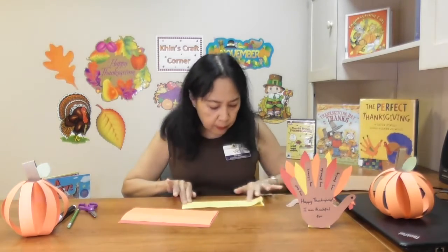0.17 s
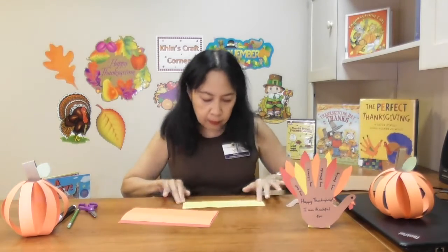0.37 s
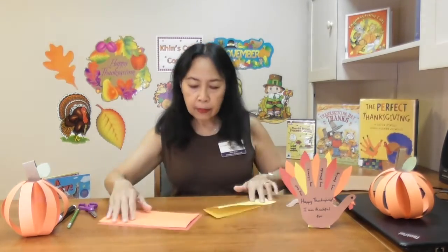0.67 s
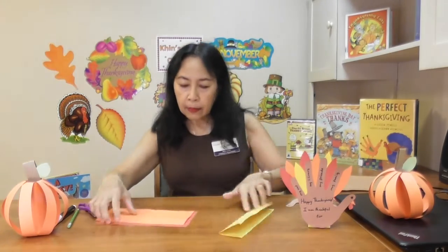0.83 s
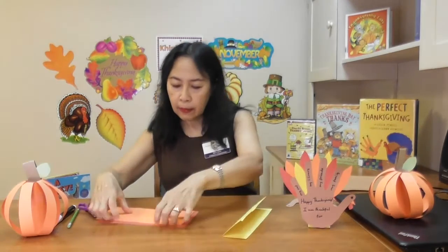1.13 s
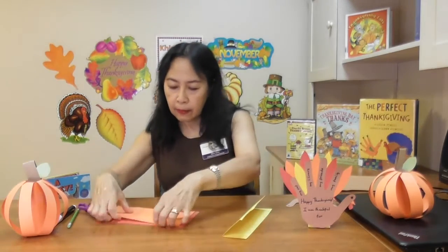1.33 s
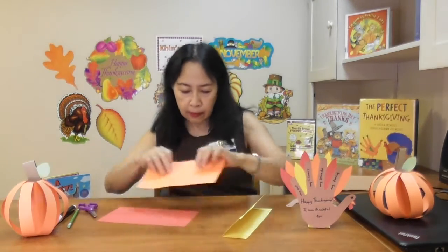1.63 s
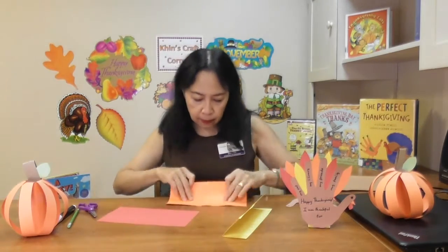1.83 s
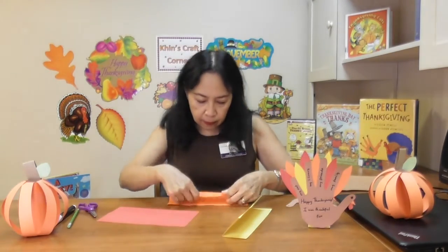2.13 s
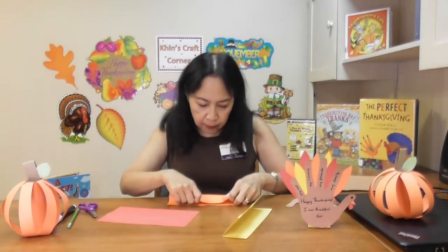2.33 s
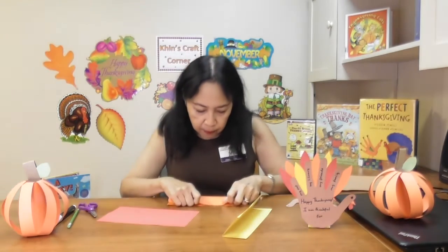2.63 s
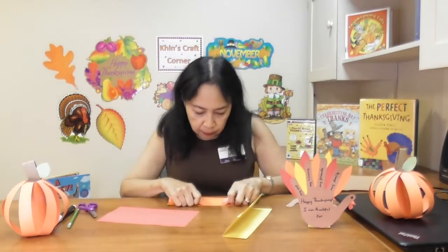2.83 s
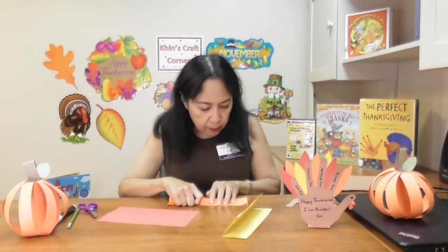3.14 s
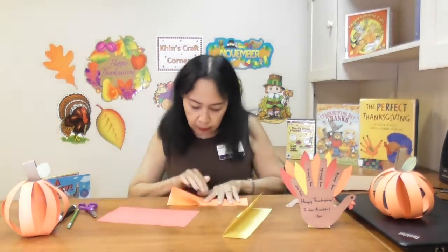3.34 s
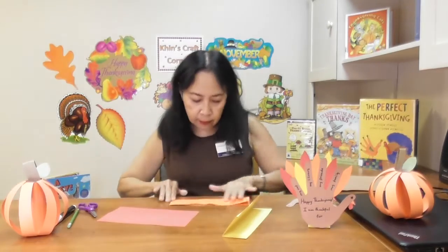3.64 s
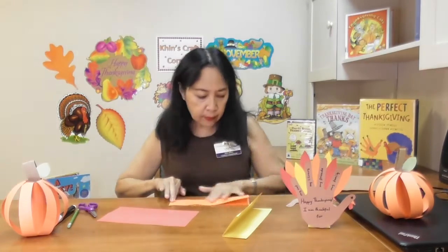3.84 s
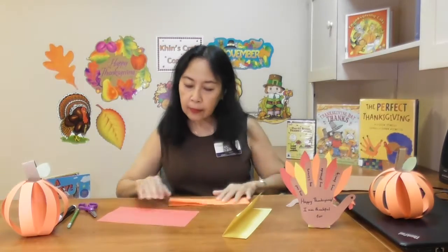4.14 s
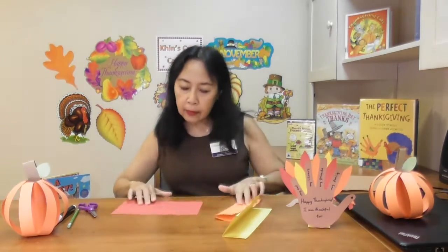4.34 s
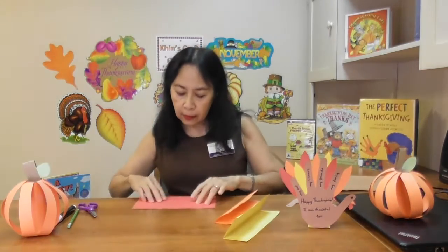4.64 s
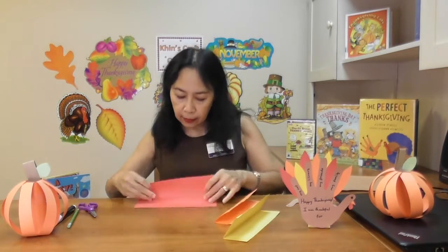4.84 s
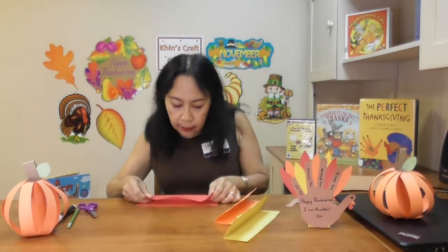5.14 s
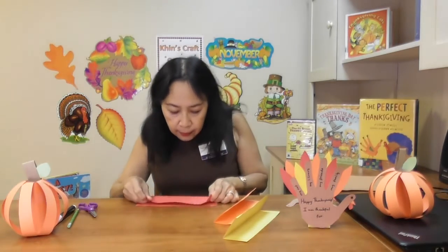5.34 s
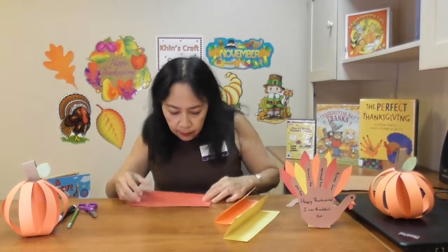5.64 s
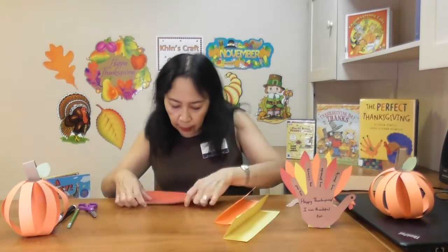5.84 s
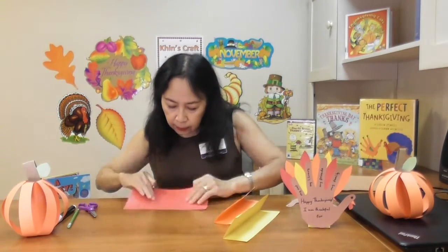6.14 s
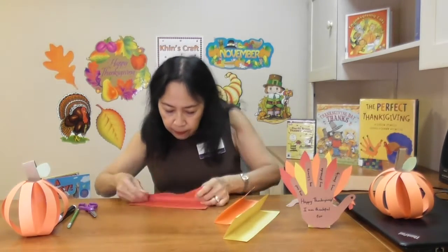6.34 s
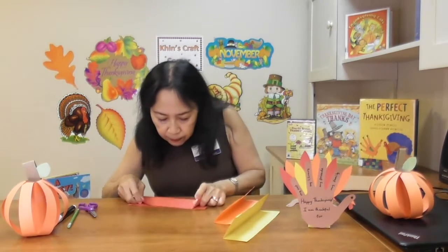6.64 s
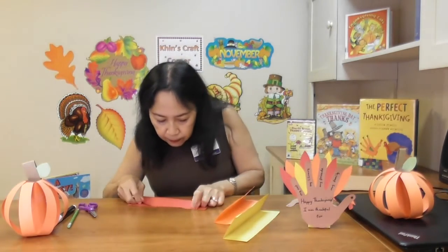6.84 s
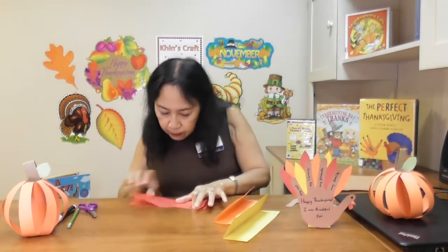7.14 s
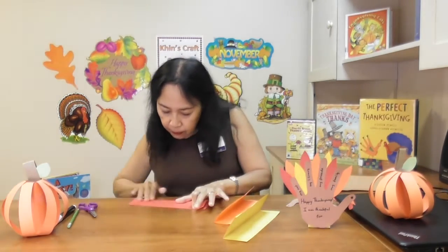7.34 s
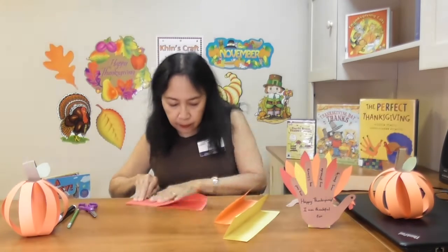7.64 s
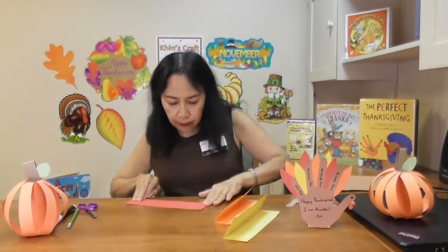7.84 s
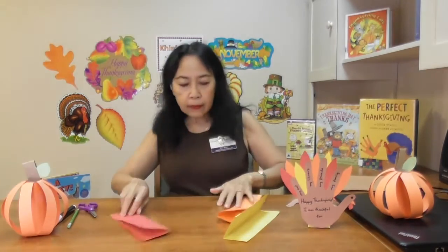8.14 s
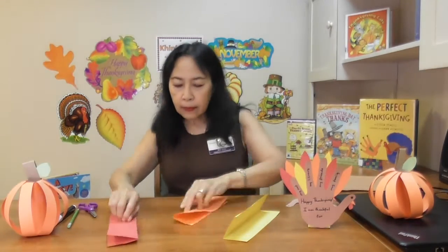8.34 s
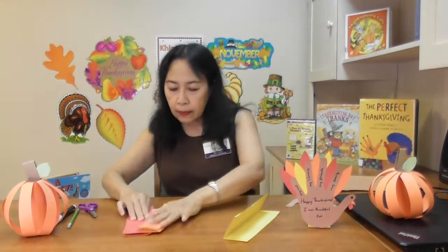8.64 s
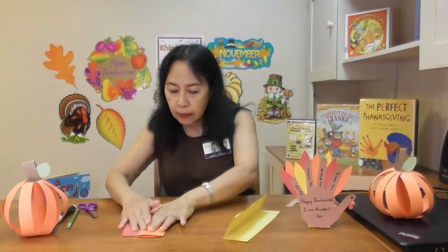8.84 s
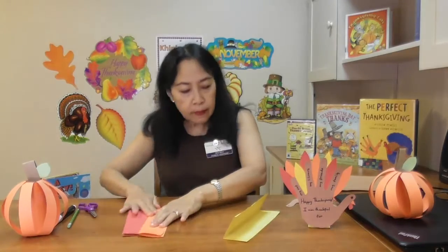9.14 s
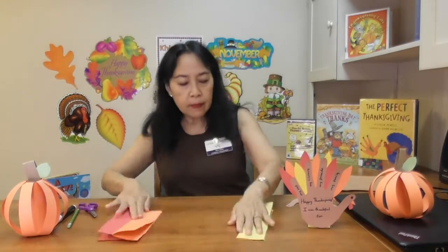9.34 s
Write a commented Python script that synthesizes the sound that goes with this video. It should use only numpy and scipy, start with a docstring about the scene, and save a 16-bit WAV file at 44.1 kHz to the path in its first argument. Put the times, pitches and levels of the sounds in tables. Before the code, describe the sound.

In a small, quiet room, hands fold paper on a wooden table. A soft rubbing hiss with hand drag opens, over a low rush that fades by about 3 s. From 0.9 to 1.4 s there are only light touches and ticks. At 1.6 s a sharp scrape and cluster of snaps start a rustling turn, lasting to 2.2 s; a near pause follows. From 2.9 to 4.3 s firm creasing strokes hiss brightly, with strong snaps near 3.15 s. After a short gap, bending crackles and small pops begin at 4.7 s. The busiest, loudest handling comes at 5.5-6.4 s, with knocks near 5.8 s and a coarse scrape at 6.15 s. After a lull, crisp rubs run from 6.9 to 7.9 s, then looser rustles and slides continue to about 9.5 s. Lower sounds lean left; treble stays central.

```python
"""A small room with a wooden table: hands fold, crease and slide sheets of craft paper on it. Each movement is
one arch of speed that drives filtered noise: sliding hisses and scrapes, bending rustles. Edges snap (noise
bursts), panels pop (rising modes), fingers and sheets knock (ringing table modes). Behind lie soft air puffs, a
low drone, a faint steady noise floor and a fading rush; below about 2 kHz the sound leans left."""
import sys
import numpy as np
from scipy import signal
from scipy.fft import rfft, irfft, next_fast_len
from scipy.io import wavfile
from scipy.ndimage import uniform_filter1d

SR = 44100
rng = np.random.default_rng(int(sys.argv[2]) if len(sys.argv) > 2 else 0)


def output_pcm(signal):
    """Save a mono or channel-first signal as 16-bit PCM at the path in sys.argv[1].

    Samples are clipped to [-1, 1] before scaling.
    """
    pcm = np.clip(np.atleast_2d(signal).T, -1, 1) * 32767
    wavfile.write(sys.argv[1], SR, np.round(pcm).astype(np.int16))


N = 418509
TIME_S = np.arange(N) / SR


def amp(db):
    """Converts dB to amplitude."""
    return 10 ** (np.asarray(db) / 20)


def unit(x):
    """Scales to rms 1."""
    return x / np.sqrt(np.mean(x ** 2) + 1e-20)


def read(points, hz):
    """Interpolates a curve on a log-frequency axis."""
    point_hz, value = np.transpose(points)
    return np.interp(np.log(hz + 1), np.log(np.abs(point_hz) + 1), value)


def follow(rows, t_s):
    """Interpolates every column of a time curve."""
    point_s, *columns = np.transpose(rows)
    return [np.interp(t_s, point_s, column) for column in columns]


def add(mix, start_s, sound):
    """Adds a sound in place, cut off at the end of the mix."""
    part = mix[max(round(start_s * SR), 0):][:len(sound)]
    part += sound[:len(part)]


def colour(x, gain):
    """Filters by a gain given as a function of frequency."""
    size = next_fast_len(len(x) + 4096)
    hz = np.fft.rfftfreq(size, 1 / SR)
    return irfft(rfft(x, size) * gain(hz), size)[:len(x)]


def edge(x, hz, kind, order):
    """Causal Butterworth low-pass or high-pass."""
    sos = signal.butter(order, np.clip(hz, 20, .45 * SR), kind, fs=SR, output="sos")
    return signal.sosfilt(sos, x)


def noise_spectrum(spectrum):
    """Steady noise of rms 1 with the given spectrum."""
    return unit(colour(rng.standard_normal(N), lambda hz: amp(read(spectrum, hz))))


def wander(hz):
    """Random drift of rms 1 with a Gaussian roll-off at the given rate."""
    return unit(colour(rng.standard_normal(N), lambda f: np.exp(-(f / hz) ** 2)))


def slips(per_s, spread_db, smooth):
    """Fibres catch and let go: sparse clicks of uneven size over a blur of tiny ones."""
    sizes = amp(spread_db * np.minimum(rng.exponential(1, N), 4))
    signs = rng.choice([-1., 1.], N)
    clicks = sizes * signs * (rng.random(N) < per_s / SR)
    return unit(unit(clicks) + smooth * rng.standard_normal(N))


def patchy(drive, spectrum, patchy_db, tilt_db_per_octave=None):
    """Shapes noise to a spectrum whose colour drifts in random patches, with an optional tilt."""
    hz, t_s, z = signal.stft(drive, SR, nperseg=512, noverlap=384)
    patches = uniform_filter1d(rng.standard_normal(z.shape), size=3, axis=0)
    patches = unit(uniform_filter1d(patches, size=14, axis=1))
    shape_db = read(spectrum, hz)[:, None] + patchy_db * patches
    if tilt_db_per_octave is not None:
        octaves = np.log2(np.clip(hz, 900, 3000) / 1600)
        shape_db = shape_db + octaves[:, None] * np.interp(t_s, TIME_S, tilt_db_per_octave)
    gain = amp(shape_db)
    gain = gain / np.linalg.norm(gain, axis=0)
    return unit(signal.istft(z * gain, SR, nperseg=512, noverlap=384)[1][:N])


def speed(length_s, fastest, landing=0.19, touch_s=0.0036):
    """A hand lands part-way up its arch of speed and slows to a stop; a slow rise fades in gently."""
    t_s = np.arange(0, max(length_s, touch_s), 1 / SR)
    rise_s = length_s * np.clip(fastest, 0, 1)
    phase = np.interp(t_s, [0, rise_s, length_s], [landing, .5, 1])
    contact = np.minimum(t_s / max(touch_s, 0.17 * rise_s), 1)
    return np.abs(np.sin(np.pi * phase)) * contact


def loudness(moves, power, rest_db):
    """Level [dB] of moves (start, length, fastest, dB), each a power of speed, summed over a floor."""
    energy = np.full(N, amp(rest_db) ** 2)
    for start_s, length_s, fastest, db in moves:
        add(energy, start_s, (amp(db) * speed(length_s, fastest) ** power) ** 2)
    return 10 * np.log10(energy)


# Hand or sheet slides: (start [s], length [s], position of top speed [0-1 of length],
# relative fine hiss level [dB], relative coarse scrape level [dB])
SLIDE_STROKES = [(0, 0.39, 0.3, -45.5, -47.5), (0.406, 0.14, 0.72, -54.5, -57),
                 (0.517, 0.1, 0.17, -45, -55), (0.572, 0.23, 0.31, -47, -55.5),
                 (0.691, 0.29, 0.54, -48, -57.5), (0.98, 0.034, 0.6, -57, -85),
                 (1.092, 0.07, 0, -54.5, -106), (1.201, 0.058, 0.37, -57.5, -78),
                 (1.262, 0.065, 0.46, -62.5, -72), (1.422, 0.35, 0.27, -49, -53),
                 (1.584, 0.084, 0.17, -34.5, -38), (1.773, 0.47, 0.24, -45, -42.5),
                 (2.041, 0.16, 0.46, -45, -45), (2.303, 0.078, 0.37, -52, -58),
                 (2.355, 0.076, 0.5, -56.5, -68), (2.492, 0.066, 0.58, -62, -52),
                 (2.529, 0.33, 0.31, -71, -65.5), (2.779, 0.039, 0.16, -55, -61.5),
                 (2.874, 0.16, 0.84, -49.5, -45.5), (2.996, 0.29, 0.46, -43.5, -47),
                 (3.219, 0.23, 0.7, -42.5, -47.5), (3.445, 0.27, 0.19, -36, -47.5),
                 (3.682, 0.15, 0.51, -40, -55.5), (3.81, 0.17, 0.59, -39, -54),
                 (3.885, 0.12, 0.65, -44, -53.5), (4.155, 0.045, 0.73, -45.5, -50.5),
                 (4.188, 0.22, 0.21, -51, -59), (4.312, 0.17, 0.62, -49, -62),
                 (4.726, 0.39, 0.42, -44.5, -62.5), (4.789, 0.34, 0.28, -58, -42.5),
                 (4.997, 0.23, 0.43, -48, -45.5), (5.186, 0.16, 0.12, -63.5, -60),
                 (5.494, 0.18, 0.57, -43.5, -43), (5.646, 0.079, 0.37, -51.5, -48.5),
                 (5.765, 0.066, 0, -52, -40.5), (5.812, 0.12, 0, -47.5, -46.5),
                 (5.871, 0.22, 0.73, -39.5, -41), (6.151, 0.097, 0.45, -46, -34),
                 (6.198, 0.42, 0.41, -39, -45), (6.561, 0.1, 0.4, -62, -56), (6.932, 0.066, 0.65, -49, -56),
                 (6.978, 0.16, 0.44, -40.5, -50.5), (7.122, 0.14, 0.34, -39, -45.5),
                 (7.282, 0.25, 0.08, -39.5, -45.5), (7.547, 0.14, 0.53, -38, -49.5),
                 (7.673, 0.21, 0.47, -33.5, -47), (7.983, 0.88, 0.1, -50.5, -57.5),
                 (8.252, 0.16, 0.28, -41, -50.5), (8.416, 0.11, 0.34, -35, -43),
                 (8.466, 0.24, 0.82, -50.5, -53.5), (8.622, 0.18, 0.58, -46, -52.5),
                 (8.86, 0.21, 0.6, -43.5, -54), (9.041, 0.22, 0.48, -39, -47),
                 (9.311, 0.2, 0.15, -50.5, -60), (9.435, 0.092, 0.9, -39.5, -48)]


def scraping():
    """Relative scrape level [dB] of all strokes; the floor is fingers never quite still."""
    moves = [(start_s, length_s, fastest, db) for start_s, length_s, fastest, _, db in SLIDE_STROKES]
    return loudness(moves, power=3.72, rest_db=-88.5)


# Spectra of sliding paper: (frequency [Hz], relative level [dB])
HISS_SPECTRUM = [(2000, -59.5), (4500, -32.5), (7000, -7.5), (10000, -8.5), (12000, 0), (14000, 3),
                 (15500, 2)]
SCRAPE_SPECTRUM = [(1200, -34), (2200, -5.5), (3200, -6), (4300, 6.5), (5400, 5), (7000, 2), (9000, -4.5),
                   (14000, -25)]


def sliding():
    """Dense tiny slips hiss, with a coarser scrape; a light touch breaks up into separate ticks."""
    moves = [(start_s, length_s, fastest, db) for start_s, length_s, fastest, db, _ in SLIDE_STROKES]
    hiss_db = loudness(moves, power=2.79, rest_db=-82)
    scrape_db = scraping()
    lightness = np.clip((-51.5 - np.maximum(hiss_db, scrape_db)) / 14, 0, 1)
    catches = (rng.random(N) < 22 / SR) * rng.uniform(0.92, 1, N)  # 22 per s
    ticks = signal.lfilter([1], [1, -np.exp(-1 / (0.014 * SR))], catches)  # 14 ms decay
    flutter = amp(1.53 * wander(hz=58.7))
    grip = 1 - 0.72 * lightness + 2.03 * lightness * ticks
    drive = slips(per_s=2400, spread_db=2.5, smooth=1.0) * flutter * grip
    hiss = patchy(drive, HISS_SPECTRUM, patchy_db=2.5) * amp(hiss_db + 4.5)
    scrape = patchy(drive, SCRAPE_SPECTRUM, patchy_db=3.5) * amp(scrape_db - 3.0)
    return hiss + scrape


# Sheet is bent over: (start [s], length [s], position of fastest bending [0-1 of length],
# relative rustle level [dB], tilt [dB per octave])
SHEET_BENDS = [(0.53, 0.1, 0.48, -57.5, -0.5), (0.869, 0.16, 0.07, -53.5, -10), (1.448, 0.09, 1, -52, 4),
               (1.585, 0.23, 0.03, -45.5, -6), (1.76, 0.3, 0.66, -43.5, 9), (2.039, 0.29, 0.03, -48, 16.5),
               (2.308, 0.1, 0.96, -50, 6.5), (2.911, 0.15, 0.83, -53.5, 2), (3.155, 0.14, 0, -46.5, -2.5),
               (3.31, 0.12, 0.69, -46, 3.5), (4.415, 0.089, 0.14, -55.5, 1.5), (4.821, 0.59, 0.18, -41, 5),
               (5.53, 0.13, 0.69, -42, 0.5), (5.767, 0.21, 0, -39, -7), (5.955, 0.19, 0, -40, -5.5),
               (6.161, 0.15, 0.11, -37.5, 1.5), (6.236, 0.37, 0.13, -41.5, 7.5),
               (7.028, 0.057, 0.93, -53.5, 6), (7.166, 0.082, 0.45, -44.5, 1),
               (7.248, 0.06, 0.27, -42.5, -0.5), (7.597, 0.082, 0.6, -49.5, -7.5),
               (7.738, 0.21, 0.28, -56, 2), (8.074, 0.18, 0.12, -41.5, -2.5),
               (8.103, 0.25, 0.33, -45, -15.5), (8.417, 0.11, 0.16, -42, 9), (8.598, 0.088, 0, -54, -6.5),
               (9.055, 0.17, 0.55, -55, 14.5)]
REST_RUSTLE_DB = -84


def stiffness():
    """Tilt [dB per octave] averaged over the bends under way, the louder ones weighing more."""
    weight, tilt = np.full(N, amp(REST_RUSTLE_DB)), np.zeros(N)
    for start_s, length_s, fastest, db, db_per_octave in SHEET_BENDS:
        strength = amp(db) * speed(length_s, fastest)
        add(weight, start_s, strength)
        add(tilt, start_s, strength * db_per_octave)
    return tilt / weight


# Heel of a hand drags on the table: (start [s], length [s], relative level [dB])
HAND_DRAGS = [(0.0, 0.39, -53.5), (0.512, 0.15, -52.5), (1.59, 0.13, -50.5), (1.77, 0.17, -47.5),
              (2.107, 0.11, -53), (2.963, 0.12, -53), (3.097, 0.17, -52.5), (3.315, 0.16, -49.5),
              (3.41, 0.26, -59.5), (5.59, 0.068, -51.5), (6.154, 0.069, -39), (6.205, 0.074, -43.5),
              (7.05, 0.096, -55), (7.177, 0.053, -48), (7.269, 0.038, -47), (7.599, 0.088, -51),
              (8.404, 0.093, -52)]
# Spectra of bending paper and dragging hand: (frequency [Hz], relative level [dB])
RUSTLE_SPECTRUM = [(300, -34), (650, -19.5), (830, 1), (1000, 5.5), (1650, 3), (2200, 3), (2900, -2.5),
                   (4000, 1), (8000, -35.5)]
DRAG_SPECTRUM = [(50, -42.5), (100, -4.5), (230, -0.5), (340, 5.5), (420, -3), (510, 12), (620, 2.5),
                 (850, 7), (1400, -56.5)]


def bending():
    """Larger slips shake the whole sheet; hands drag on the table; slides add some of both."""
    bends = [(start_s, length_s, fastest, db) for start_s, length_s, fastest, db, _ in SHEET_BENDS]
    drags = [(start_s, length_s, .4, db) for start_s, length_s, db in HAND_DRAGS]
    rustle_db = loudness(bends, power=3.98, rest_db=REST_RUSTLE_DB)
    drag_db = loudness(drags, power=2.1, rest_db=-78)
    scrape_db = scraping()
    flutter = amp(1.8 * wander(hz=90))
    drive = slips(per_s=700, spread_db=2.5, smooth=1.4) * flutter
    rustle = patchy(drive, RUSTLE_SPECTRUM, patchy_db=3.6, tilt_db_per_octave=stiffness())
    drag = patchy(slips(per_s=490, spread_db=5, smooth=1.0), DRAG_SPECTRUM, patchy_db=2.5)
    rustle_gain = np.hypot(amp(rustle_db - 3.5), amp(scrape_db - 18))
    drag_gain = np.hypot(amp(drag_db - 5.0), amp(scrape_db - 21))
    return through_table(rustle) * rustle_gain + drag * drag_gain


# Sheet buckles or its edge flicks: (time [s], relative level [dB],
# low edge before widening [Hz], high edge [Hz])
SHEET_SNAPS = [(0.499, -42.5, 6700, 15000), (0.534, -49, 4500, 15000), (0.551, -43, 1120, 14000),
               (1.537, -44.5, 1800, 2900), (1.595, -35, 2470, 15000), (1.611, -31, 1520, 3320),
               (1.633, -34.5, 915, 2760), (1.653, -36, 1670, 5200), (1.78, -48, 1000, 13000),
               (1.801, -36.5, 1800, 7600), (1.812, -40, 990, 5060), (2.124, -31, 1400, 7560),
               (2.843, -51, 5060, 5500), (2.927, -39.5, 3550, 7800), (3.152, -34, 1210, 2290),
               (3.172, -28, 1320, 3200), (3.336, -39, 1400, 5530), (3.425, -36, 1500, 7300),
               (3.475, -47, 1500, 9000), (4.177, -46.5, 1050, 12000), (4.852, -35.5, 1325, 2380),
               (5.306, -52.5, 1600, 4600), (5.586, -32.5, 1280, 3500), (5.614, -34, 1950, 14000),
               (5.721, -42.5, 5630, 15200), (5.767, -36, 980, 3000), (5.824, -32.5, 1095, 2190),
               (5.998, -31, 1303, 6500), (6.139, -41, 955, 14700), (6.574, -50.5, 4560, 6870),
               (7.095, -44, 1980, 6960), (7.136, -46, 5950, 14860), (7.258, -38.5, 1510, 14800),
               (7.587, -32.5, 4500, 9000), (7.628, -38, 1760, 7180), (7.713, -39, 1020, 2540),
               (7.757, -33.5, 990, 4500), (7.774, -38, 1210, 5610), (8.434, -46, 1515, 8900),
               (8.458, -43, 9100, 15100), (8.723, -43.5, 1440, 7140), (9.351, -49.5, 3500, 4830)]


def snapping(crack_s=0.0015, ring_s=0.008, ring=0.8):
    """A sharp crack, then a few milliseconds of shiver in the sheet."""
    out, t_s = np.zeros(N), np.arange(4096) / SR
    for start_s, db, low_hz, high_hz in SHEET_SNAPS:
        envelope = np.exp(-t_s / crack_s) + ring * np.exp(-t_s / ring_s)
        burst = rng.standard_normal(len(t_s)) * envelope
        snap = edge(burst, low_hz * 0.77, "highpass", order=3)
        snap = edge(snap, high_hz, "lowpass", order=3)
        add(out, start_s, amp(db - 14.0) * through_table(snap))
    return out


# Panel of the sheet pops over: (time [s], relative level [dB], starting pitch [Hz])
PANEL_POPS = [(1.3, -56, 1464), (1.402, -54.5, 1483), (1.537, -41.5, 1730), (2.313, -53, 3440),
              (2.378, -50.5, 2230), (2.4, -53.5, 3830), (4.415, -60.5, 1227), (4.931, -38, 1192),
              (5.009, -41, 1217), (5.553, -39, 1470), (5.679, -48, 2170), (8.602, -50, 1623),
              (9.35, -44, 1210)]
# Modes of a popping panel: (multiple of its pitch, relative level [dB])
PANEL_MODES = [(1, 4), (1.75, -12), (3.05, -9)]


def popping(rise_s=0.0015, ring_s=0.01, tighten=0.1, rough=0.9):
    """A buckling panel rings with a few unsteady modes that rise as the paper tightens."""
    out, t_s = np.zeros(N), np.arange(4096) / SR
    envelope = np.minimum(t_s / rise_s, 1) * np.exp(-t_s / ring_s)
    for start_s, db, hz in PANEL_POPS:
        turns = np.cumsum(hz * (1 + tighten * np.tanh(t_s / ring_s / 2))) / SR
        for multiple, mode_db in PANEL_MODES:
            drift = unit(edge(rng.standard_normal(len(t_s)), hz * multiple / 7, "lowpass", order=2))
            shiver = (1 + rough * drift) / np.hypot(1, rough)
            tone = np.sin(2 * np.pi * multiple * turns)
            add(out, start_s, amp(db + mode_db) * envelope * shiver * tone)
    return out


# Fingers or a sheet land on the table: (time [s], relative level [dB], high edge [Hz], contact length [s])
TABLE_KNOCKS = [(0.559, -58, 1270, 0.0088), (0.893, -55, 990, 0.071), (1.143, -56, 824, 0.016),
                (1.215, -59.5, 600, 0.022), (1.286, -52, 810, 0.03), (1.454, -59, 870, 0.045),
                (1.614, -52.5, 1120, 0.0088), (1.634, -47.5, 1330, 0.014), (2.123, -48, 1350, 0.0025),
                (2.297, -47, 1110, 0.0033), (3.11, -44.5, 770, 0.029), (3.431, -55.5, 596, 0.02),
                (3.478, -48, 518, 0.027), (4.177, -51, 1160, 0.026), (4.852, -53.5, 1270, 0.0034),
                (5.696, -55.5, 1140, 0.0048), (5.769, -40, 1510, 0.005), (5.824, -39.5, 1407, 0.003),
                (5.83, -35.5, 1190, 0.0042), (5.898, -47.5, 1410, 0.042), (6.91, -48, 870, 0.011),
                (7.268, -54, 426, 0.057), (7.624, -54.5, 555, 0.009), (7.714, -50, 1400, 0.0053),
                (8.725, -51.5, 410, 0.023), (8.887, -63.5, 343, 0.049), (9.411, -60.5, 457, 0.022)]
# Modes of the table: (frequency [Hz], relative level when knocked [dB], t60 when knocked [s])
TABLE_MODES = [(245, -13, 0.099), (343.6, -2.5, .1), (525, 2.5, 0.07), (849, 0, 0.045), (998, 4.5, 0.022),
               (1237, -3, 0.051), (1501, 0.5, 0.11), (1640, -7.5, .1)]


def knocking(thud=0.83, thud_s=0.0027, patter=0.46):
    """A blow and a patter of smaller contacts ring the table; soft flesh takes off the treble."""
    out, t_s = np.zeros(N), np.arange(8192) / SR
    for start_s, db, high_hz, contact_s in TABLE_KNOCKS:
        # the longer the contact, the more the patter outweighs the first blow
        force = patter * rng.standard_normal(len(t_s)) * np.exp(-(t_s / contact_s) ** 4)
        force *= rng.random(len(t_s)) < 3000 / SR
        force[0] += 0.0062 / contact_s
        ring = np.zeros(len(t_s))
        for hz, mode_db, t60_s in TABLE_MODES:
            mode = amp(-60 * t_s / t60_s) * np.sin(2 * np.pi * hz * t_s)
            ring += amp(mode_db) * unit(signal.fftconvolve(force, mode)[:len(t_s)])
        push = edge(rng.standard_normal(len(t_s)), 1700, "lowpass", order=2)
        push *= np.exp(-t_s / np.hypot(thud_s, contact_s / 2))
        low_hz = 9.3 * np.sqrt(high_hz)  # a softer blow reaches further into the bass
        knock = edge(unit(ring) + thud * unit(push), low_hz, "highpass", order=6)
        knock = edge(knock, high_hz, "lowpass", order=7)
        filter_delay_s = 2 / high_hz  # start early by about the low-pass filter's delay
        add(out, start_s - filter_delay_s, amp(db - 3.5) * unit(knock))
    return out


def through_table(x, share=0.8, width_hz=40):
    """A sheet that lies on the wood also sets the table's modes ringing."""
    modes = sum(signal.lfilter(*signal.iirpeak(hz, hz / width_hz, fs=SR), x) for hz, _, _ in TABLE_MODES)
    return unit(x + share * modes)


# Swung sheet or hand pushes air: (start [s], length [s], level [dB])
AIR_PUFFS = [(3.397, 0.22, -69), (5.76, 0.18, -64), (6.16, 0.2, -66.5), (7.17, 0.21, -65)]


def puffing(low_hz=96, high_hz=138):
    """Air pushed by the sheet or hand: a brief, very low flutter of band-passed noise."""
    air = edge(rng.standard_normal(N), low_hz, "highpass", order=4)
    air = edge(air, high_hz, "lowpass", order=4)
    moves = [(start_s, length_s, .4, db) for start_s, length_s, db in AIR_PUFFS]
    return unit(air) * amp(loudness(moves, power=1, rest_db=-110))


# Reverberation of the room: (frequency [Hz], t60 [s])
ROOM_DECAY = [(200, 0.2), (3700, 0.1), (16000, 0.12)]


def room(x, wet_db):
    """Sparse reflections of random sign, each band dying at its own speed."""
    size = SR // 3
    taps = rng.choice([-1., 1.], size) * (rng.random(size) < 3000 / SR)
    taps *= np.arange(size) > .003 * SR
    hz, t_s, z = signal.stft(taps, SR, nperseg=256)
    decay = amp(-60 * t_s / read(ROOM_DECAY, hz)[:, None])
    tail = signal.istft(z * decay, SR, nperseg=256)[1]
    reflections = signal.fftconvolve(x, tail / np.linalg.norm(tail))[:N]
    wet = amp(wet_db)
    return (x + wet * reflections) / np.hypot(1, wet)


# Low drone: (time [s], fundamental level [dB], second harmonic level [dB])
DRONE_LEVEL = [(4.6, -90.5, -97), (5, -79.5, -83), (6.9, -82.5, -92.5), (7.4, -78, -73.5),
               (9.1, -69, -74.5), (9.3, -89, -89)]


def hum(hz=111, width_hz=8):
    """A low, broken drone: two narrow bands of noise an octave apart."""
    out = np.zeros(N)
    for k, db in enumerate(follow(DRONE_LEVEL, TIME_S), 1):
        band = colour(rng.standard_normal(N), lambda f: 1 / (1 + ((f - k * hz) / (width_hz * k ** .5)) ** 2))
        out += amp(db) * unit(band)
    return out


# Left against right, before the diffuse part: (frequency [Hz], left minus right [dB])
LEFT_BALANCE = [(100, 10), (400, 10.5), (1000, 9), (2200, 4.5), (4000, .3), (7000, 0)]
# Phase between the sides, before the diffuse part: (frequency [Hz], lag of left [rad])
LEFT_LAG = [(400, .15), (1000, .6), (2100, .9), (4200, .35), (7000, 0)]
# Diffuse side signal: (frequency [Hz], gain [dB])
SIDE_WIDTH = [(300, -8.5), (2000, -8), (4200, -13.5), (6500, -29), (12000, -32)]


def microphones(x):
    """Bass and middle lean left and spread through a diffuse scatter; the treble stays in the centre."""
    t_s = np.arange(8192) / SR
    scatter = rng.standard_normal(len(t_s)) * np.exp(-t_s / .025)
    scattered = signal.fftconvolve(x, scatter / np.linalg.norm(scatter))[:N]
    diffuse = colour(scattered, lambda hz: amp(read(SIDE_WIDTH, hz)))

    def side_share(hz):
        """tanh of half the complex log ratio of left to right."""
        return np.tanh(np.log(amp(read(LEFT_BALANCE, hz))) / 2 - .5j * read(LEFT_LAG, hz))

    lean = colour(x, side_share)
    return np.array([x + lean + diffuse, x - lean - diffuse])


# Spectra of the faint noise floor and low rush: (frequency [Hz], relative level [dB])
FLOOR_SPECTRUM = [(25, -42.5), (110, 13.5), (400, 13.5), (500, 13), (620, -3), (1300, 12.5), (8000, -20),
                  (15000, -41.5)]
RUSH_SPECTRUM = [(70, -24.5), (260, -8), (500, 1.5), (720, -4), (1000, -18.5), (4000, -55.5)]
# Low rush dies away: (time [s], relative level [dB])
RUSH_FADE = [(0, -56), (1.3, -58), (2.4, -70.5), (4, -77)]


def background():
    """A faint steady noise floor and a fading low rush as shaped noise, drawn afresh at each call."""
    rush_db = follow(RUSH_FADE, TIME_S)[0] - 4.0
    return amp(-79) * noise_spectrum(FLOOR_SPECTRUM) + amp(rush_db) * noise_spectrum(RUSH_SPECTRUM)


def scene():
    """Paper and table in the room, drone and puffs dry; each side has its own background."""
    paper = room(sliding(), wet_db=-12) + room(bending(), wet_db=-7.5)
    paper += room(snapping() + popping(), wet_db=-4.5)
    table = room(knocking(), wet_db=-11)
    return microphones(paper + table + hum() + puffing()) + np.array([background(), background()])


def record(dry, edge_hz=15950):
    """Band limit: a steep linear-phase low-pass."""
    taps = signal.firwin(511, edge_hz, window=("kaiser", 9), fs=SR)
    return signal.oaconvolve(dry, taps[None], "same")


dry = scene()
out = record(dry)
output_pcm(out)
```